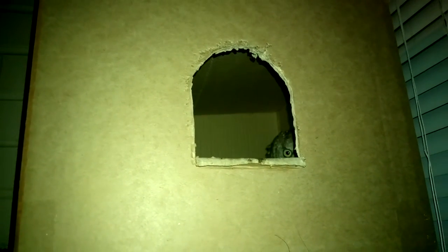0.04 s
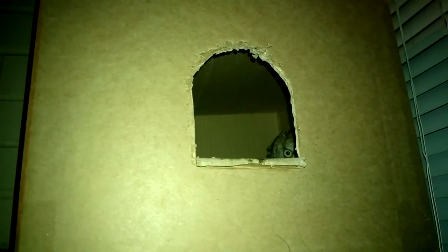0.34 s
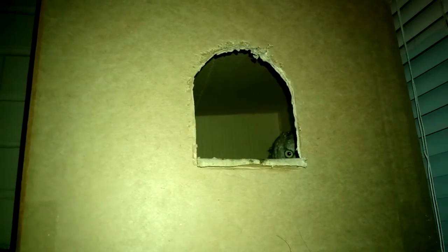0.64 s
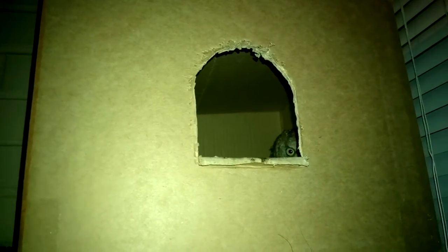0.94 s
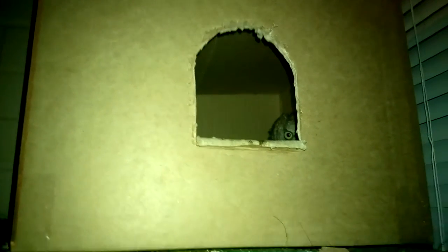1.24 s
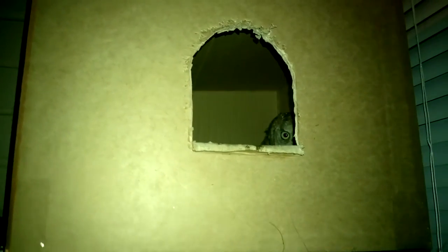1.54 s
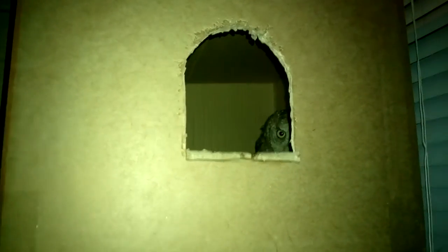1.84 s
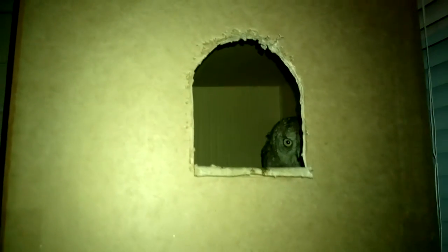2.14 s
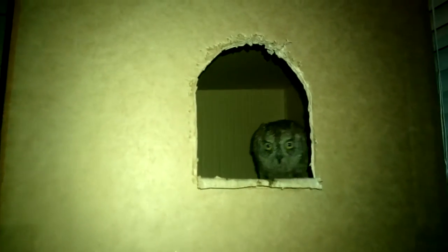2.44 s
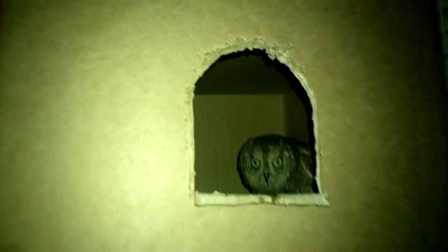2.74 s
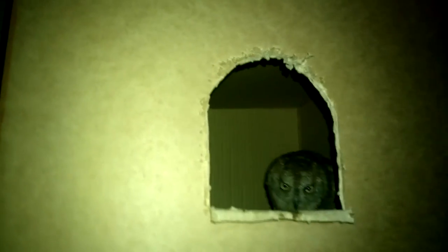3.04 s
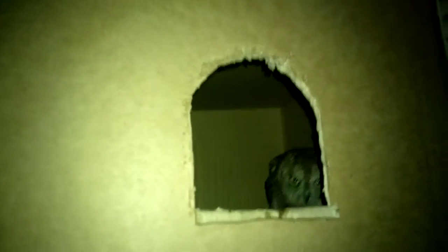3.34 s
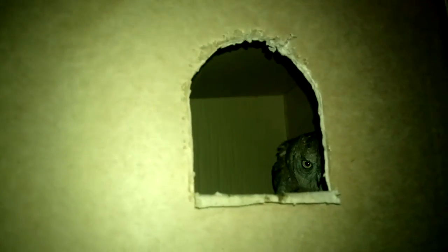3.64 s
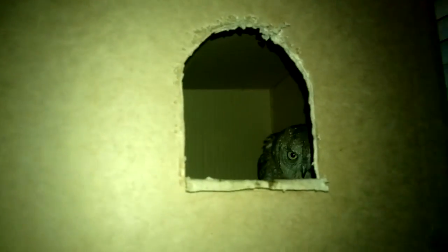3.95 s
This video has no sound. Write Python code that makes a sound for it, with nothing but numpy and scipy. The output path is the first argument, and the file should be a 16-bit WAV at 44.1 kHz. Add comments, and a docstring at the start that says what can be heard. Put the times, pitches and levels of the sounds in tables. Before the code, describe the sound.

Over the low rumble of a quiet room, a small owl hoots once, brief and almost whistle-pure. Close handling crackle and faint cloth swishes follow beside the microphone, then a few light finger scrapes and taps on the right.

```python
"""An owl in a nest box

A small owl in a cardboard box gives one soft, nearly pure hoot, and a quiet room answers.
A hand shifts its grip on the camera: stick-slip friction makes skin crackle and scuff beside the
microphones, and sleeves swish. Later a finger scrapes and taps by the right port, ringing its hollow.
Low rumble and room air lie underneath."""
import sys
import numpy as np
from scipy import signal
from scipy.fft import rfft, irfft, next_fast_len
from scipy.io import wavfile
from scipy.ndimage import uniform_filter1d, map_coordinates

SR = 44100
rng = np.random.default_rng(int(sys.argv[2]) if len(sys.argv) > 2 else 0)


def master(y):
    """Save y as 16-bit WAV."""
    cut = np.clip(np.atleast_2d(y).T, -1, 1)
    pcm = np.round(cut * 32767)  # scale
    wavfile.write(sys.argv[1], SR, pcm.astype(np.int16))


N = 176400
TIME = np.arange(N) / SR


def amp(db):
    """Amplitude ratio: tenfold for every 20 dB."""
    return 10 ** (np.asarray(db) / 20)


def unit(x):
    """Normalisation to rms 1."""
    return x / np.sqrt(np.mean(x ** 2) + 1e-20)


def along(points, hz):
    """Interpolation of (Hz, value) points on a log frequency axis."""
    freqs, values = np.transpose(points)
    return np.interp(np.log(hz + 1), np.log(freqs + 1), values)


def curves(rows):
    """Linear interpolation in time of each column after the first."""
    times, *columns = np.transpose(rows)
    return np.array([np.interp(TIME, times, column) for column in columns])


def gate(rows):
    """Rectangular window from a table's first time to its last."""
    return (TIME > rows[0][0]) * (TIME < rows[-1][0])


def pan(db):
    """Level-difference panning: two gains, the left db above the right."""
    return amp(np.array([[db], [-db]]) / 2)


def pan_bands(x, balance):
    """Level-difference panning that varies with frequency."""
    return filtered(x, lambda hz: amp(np.outer([1, -1], along(balance, hz)) / 2))


def wobble(rate):
    """Smooth random modulation: a spline through rate knots a second."""
    return map_coordinates(rng.standard_normal(int(N * rate / SR) + 4), [TIME * rate])


def filtered(x, response):
    """Linear filtering: the spectrum times a frequency response."""
    size = next_fast_len(N + SR // 2)
    return irfft(rfft(x, size) * response(np.fft.rfftfreq(size, 1 / SR)), size)[..., :N]


def coloured(x, tone):
    """Spectral shaping by (Hz, dB) points, at rms 1."""
    return unit(filtered(x, lambda hz: amp(along(tone, hz))))


def noise(tone):
    """Coloured noise, uncorrelated left and right."""
    return coloured(rng.standard_normal((2, N)), tone)


def friction(tone, slips_per_s, spread_db, smooth, life_s=0.00082):
    """Stick-slip friction: tiny noise bursts of random size over a smooth rub."""
    slipping = rng.random(N) < slips_per_s / SR
    sizes = amp(spread_db * np.clip(rng.standard_normal(N), -2, 2))
    bursts = unit(signal.lfilter([1], [1, -np.exp(-1 / (life_s * SR))], slipping * sizes))
    return coloured(np.hypot(bursts, smooth) * rng.standard_normal((2, N)), tone)


def click(tone, size=512):
    """Minimum-phase impulse of energy 1, made by folding the cepstrum."""
    cepstrum = irfft(np.log(amp(along(tone, np.fft.rfftfreq(size, 1 / SR)))))
    cepstrum[1:size // 2] *= 2
    cepstrum[size // 2 + 1:] = 0
    pulse = irfft(np.exp(rfft(cepstrum)))
    return pulse / np.linalg.norm(pulse)


# Likeness of the two sides. Each row: frequency in Hz, coherence from 0 to 1.
COHERENCE = [(60, 0.93), (130, 0.96), (290, 0.89), (640, 0.67), (1400, 0), (3000, 0)]
# Balance of the room noise. Each row: frequency in Hz, left over right in dB.
ROOM_BALANCE = [(60, 3.5), (200, 1), (700, 3.5), (1300, 2.5), (2400, 2.5), (4400, -0.5), (8000, -1.5)]
def diffuse(tone):
    """Diffuse field: long waves reach both microphones alike, short ones uncorrelated."""
    def mid_side_gains(hz):
        angle = np.arccos(np.clip(along(COHERENCE, hz), -1, 1)) / 2
        return np.array([np.cos(angle), np.sin(angle)])
    mid, side = filtered(noise(tone), mid_side_gains)
    return unit(pan_bands(np.array([mid + side, mid - side]), ROOM_BALANCE))


# Envelopes of the background. Each row: time in seconds, relative level in dB.
RUMBLE_LEVEL = [(0.0, -44), (0.08, -38.5), (0.27, -48), (0.33, -36.5), (0.49, -56), (0.54, -42), (0.7, -56),
                (0.73, -35), (0.82, -58), (0.91, -42.5), (1.08, -47), (1.14, -38), (1.22, -60.5),
                (1.26, -45), (1.59, -39.5), (1.61, -46), (2.17, -48.5), (2.36, -42), (2.45, -53.5),
                (2.52, -38.5), (2.57, -57), (2.73, -43.5), (2.76, -67), (2.83, -37.5), (2.87, -52),
                (2.92, -37), (3.17, -52.5), (3.44, -44.5), (3.61, -51.5), (3.64, -41.5), (3.78, -55),
                (4.0, -36.5)]
DRONE_LEVEL = [(0, -53), (.85, -53.5), (1.45, -52), (2, -57), (2.6, -54.5), (3.3, -55), (4, -54.5)]
WHIR_LEVEL = [(0, -60), (.8, -57.5), (1.5, -61), (2.2, -65), (2.9, -65.5), (3.3, -67.5), (4, -65)]
# Spectra of the background. Each row: frequency in Hz, gain in dB.
RUMBLE_TONE = [(15, -27.5), (28, -12), (38, -9), (50, -1), (57, 0.5), (65, -1.5), (78, -13.5), (105, -23.5),
               (200, -29.5), (800, -110)]
DRONE_TONE = [(60, -4.5), (115, -5.5), (138, 1.5), (175, -5.5), (210, -14), (250, -7.5), (278, -12),
              (305, -4.5), (335, -12), (380, -17.5), (410, -16), (700, -24), (1200, -42.5), (5000, -89)]
WHIR_TONE = [(400, -28), (700, -13), (830, -2.5), (935, 2.5), (1060, -3.5), (1190, -4), (1350, -7.5),
             (1650, -10.5), (2500, -29), (12000, -70)]
HISS_TONE = [(400, 1.5), (800, 0), (1130, -5.5), (1500, -14.5), (2400, -16), (4500, -14.5), (8000, -23),
             (15500, -25)]
def background(evenness=.7, window_s=.06):
    """Amplitude-modulated noise: throbbing rumble, low drone and a whir near 1 kHz, over steady hiss."""
    low = diffuse(RUMBLE_TONE)
    power = np.abs(uniform_filter1d(np.mean(low ** 2, axis=0), int(window_s * SR))) + 1e-9
    evened = unit(low / power ** (evenness / 2))  # so the envelope leads the throb
    rumble = amp(curves(RUMBLE_LEVEL) + 1) * evened
    whir = amp(curves(WHIR_LEVEL) + 1.3 * wobble(rate=6)) * diffuse(WHIR_TONE)
    drone = amp(curves(DRONE_LEVEL)) * diffuse(DRONE_TONE)
    hiss = amp(-65.3) * diffuse(HISS_TONE)
    return rumble + drone + hiss + whir


# Sleeve strokes. Each row: crest time, rise and fall over 20 dB in seconds; level, pan, treble in dB.
SWISHES = [(1.5, 0.48, 0.14, -59, -3.5, -16), (1.705, 0.32, 0.14, -57.5, -1, -16.5),
           (1.9, 0.32, 0.27, -66, -2.5, -20), (2.327, 0.039, 0.11, -58, -1.5, -7),
           (2.652, 0.12, 0.46, -73, -1.5, -2), (3.245, .06, 0.13, -66, -7, -25),
           (3.48, 0.83, 0.85, -69, -5.5, -9), (3.76, 0.039, 0.07, -60, -2, -21),
           (3.88, 0.093, 0.16, -61, -4, -20)]
# Spectra of cloth and of the treble of any slip. Each row: frequency in Hz, gain in dB.
CLOTH_TONE = [(500, -18.5), (1600, 2), (2500, -4), (4000, -0.5), (5300, 1.5), (8300, -6), (11000, -16.5),
              (14600, -32), (16000, -27)]
SLIP_TREBLE = [(4000, -24), (8000, -1), (11000, -3), (14500, -4.5), (16000, -1.5)]
def sleeves():
    """Sliding friction of cloth: soft swishes that swell and fade exponentially."""
    out = np.zeros((2, N))
    for crest, rise, fall, db, pan_db, treble_db in SWISHES:
        cloth = friction(CLOTH_TONE, slips_per_s=130, spread_db=5.5, smooth=1.6)
        cloth += amp(treble_db) * noise(SLIP_TREBLE)
        envelope = amp(db - 20 * np.maximum((crest - TIME) / rise, (TIME - crest) / fall))
        out += cloth * pan(pan_db) * envelope
    return out


# Envelopes of crackle and finer fizz. Each row: time in seconds, left and right levels in dB.
CRACKLE_LEVEL = [(.86, -100, -100), (.9, -70, -71.5), (.99, -60.5, -57.5), (1.06, -55, -56.5),
                 (1.17, -55.5, -47), (1.24, -49.5, -48.5), (1.3, -54, -50), (1.345, -55.5, -54),
                 (1.43, -55, -64.5), (1.48, -62, -65.5), (1.56, -90, -86)]
FIZZ_LEVEL = [(.98, -105, -82), (1.06, -79, -57), (1.1, -75, -49.5), (1.18, -71, -46), (1.28, -61, -52),
              (1.345, -65, -49.5), (1.42, -51, -52.5), (1.49, -72, -65.5), (1.58, -95, -81)]
# Envelope of the scuff. Each row: time in seconds, level in dB.
SCUFF_LEVEL = [(1.08, -74), (1.17, -57.5), (1.245, -47.5), (1.283, -49.5), (1.303, -49.5), (1.328, -66),
               (1.365, -49.5), (1.41, -58.5), (1.5, -89.5)]
# Spectra of the rubbing. Each row: frequency in Hz, gain in dB.
SKIN_TONE = [(300, 4.5), (1000, 7.5), (1900, -0.5), (2500, -0.5), (3500, -1), (5500, 1), (9000, -10),
             (12000, -18), (16000, -18.5)]
FIZZ_TONE = [(7000, -15.5), (10500, -9), (13000, -3), (14600, 1), (16000, -3.5)]
CASING_TONE = [(120, -8.5), (280, -5.5), (500, 1), (900, -8.5), (1400, -12), (3000, -25)]
def grip():
    """Stick-slip of skin dragging over the casing: crackle, fine fizz and a dull scuff."""
    crackle = friction(SKIN_TONE, slips_per_s=750, spread_db=4.6, smooth=.55)
    fizz = friction(FIZZ_TONE, slips_per_s=500, spread_db=5.5, smooth=.4)
    mid, side = friction(CASING_TONE, slips_per_s=590, spread_db=.5, smooth=.8)
    scuff = unit(np.array([mid + .28 * side, mid - .21 * side])) * pan(db=6)
    layers = [(crackle, CRACKLE_LEVEL), (fizz, FIZZ_LEVEL), (scuff, SCUFF_LEVEL)]
    return sum(sound * amp(curves(level)) * gate(level) for sound, level in layers)


# Snaps of the grip and small ticks. Each row: start in seconds; relative level, pan, treble in dB.
SNAPS = [(.108, -50.5, -1, -13.5), (.388, -48.5, 1, -12), (.472, -53, 1, -11), (.893, -46, -9.5, 1),
         (.907, -44.5, -13.5, -15.5), (1.012, -46.5, -10, -3.5), (1.082, -38, -6, -2.5),
         (1.094, -41.5, -12, 4.5), (1.107, -34, 0, -13.5), (1.168, -38, -8, -1), (1.1712, -37.5, -12.5, 3),
         (1.2062, -35, 6, -10), (1.2345, -39, -3.5, 1), (1.2947, -35.5, 2, 2.5), (1.334, -42, -2, 1),
         (1.3775, -36.5, -3, 1), (1.3898, -29, -8, 0), (1.394, -36, -6, 0.5), (1.416, -45, -2, -8),
         (1.4295, -34.5, -13, -7), (1.435, -32.5, -1, 1.5), (1.456, -35.5, -7.5, -3.5), (2.78, -49, -2, -7),
         (2.85, -49, -9, -11), (3.036, -45, -10, -19), (3.241, -48, -4, -20), (3.422, -44, 2, -10),
         (3.614, -53.5, -7, -1), (3.664, -57, -2, -1), (3.805, -45.5, -13.5, -17.5), (3.97, -45, 2, -12)]
# Spectrum of a snap. Each row: frequency in Hz, gain in dB.
SNAP_TONE = [(500, -1), (2500, -7), (4200, 3.5), (6200, 4.5), (9000, -24), (15000, -32)]
def snaps(t60_s=.017):
    """Impulsive release: each single slip is a sharp click, then an exponentially dying fizzle."""
    out = np.zeros((2, N))
    body, top = noise(SNAP_TONE), noise(SLIP_TREBLE)
    dull, bright = click(SNAP_TONE), click(SLIP_TREBLE)
    for start, db, pan_db, treble_db in SNAPS:
        onset = int(start * SR)
        span = slice(onset, onset + SR // 20)
        decay = amp(db - 11.5 - 60 * (TIME[span] - start) / t60_s)
        out[:, span] += pan(pan_db) * decay * (body[:, span] + amp(treble_db) * top[:, span])
        release = amp(db + 2) * (dull + amp(treble_db + 1.5) * bright)
        out[:, onset:onset + len(release)] += pan(pan_db) * release
    return out


# Knocks of the casing. Each row: start in seconds, level in dB.
BUMPS = [(1.2945, -33), (1.364, -35.5)]
# Modes of the casing. Each row: frequency in Hz, gain in dB, 60 dB decay time in seconds.
CASING_MODES = [(465, -2.5, 0.017), (697, -7, .018), (967, -5, 0.0052)]
def bumps():
    """Damped modal vibration: the casing gives under the grip with short dull knocks."""
    out = np.zeros(N)
    for start, db in BUMPS:
        age = np.clip(TIME - start, 0, .5)
        for hz, gain_db, t60 in CASING_MODES:
            out += amp(db + gain_db - 60 * age / t60) * np.sin(2 * np.pi * hz * age)
    return out


# Finger scrapes. Each row: start and length in seconds, level and treble in dB,
# the hollow's first and last pitch in Hz.
SCRAPES = [(1.687, 0.064, -61.5, 1, 1009, 1006), (2.8938, 0.025, -48, 1, 1400, 910),
           (2.971, 0.0458, -49, -9.5, 947, 1404), (3.025, 0.075, -56, -6, 1336, 1316),
           (3.318, 0.071, -68.5, 1, 1324, 1330)]
# Spectra of a scrape. Each row: frequency in Hz, gain in dB.
SCRAPE_BODY = [(300, -16), (650, 7), (1000, 10.5), (1600, 3), (2400, -11), (5000, -50)]
SCRAPE_TREBLE = [(500, -8), (1500, 8), (2500, -1), (4500, 3.5), (6800, -2.5), (9500, -19.5), (15000, -19)]
def finger_scrapes():
    """Cavity resonance: friction rings the right port's hollow, whose pitch moves with the finger."""
    out = np.zeros((2, N))
    body, top = noise(SCRAPE_BODY), noise(SCRAPE_TREBLE)
    narrowband = wobble(rate=400) + 1j * wobble(rate=400)
    for start, length, db, treble_db, from_hz, to_hz in SCRAPES:
        stroke = np.clip((TIME - start) / length, 0, 1)
        hz = from_hz + (to_hz - from_hz) * stroke
        hollow = np.real(narrowband * np.exp(2j * np.pi * np.cumsum(hz) / SR))
        scrape = amp(-2) * body + amp(-4) * hollow + amp(treble_db) * top
        out += amp(db) * np.sin(np.pi * stroke) * scrape
    return out * pan(db=-10.5)


# Fingertip taps. Each row: start in seconds, relative level in dB.
TAPS = [(2.9368, -32.5), (2.954, -31), (2.977, -38), (3.005, -39)]
# Modes of the port. Each row: initial frequency in Hz, gain in dB, 60 dB decay time in seconds.
PORT_MODES = [(960, -3, 0.015), (1280, -2, 0.011), (1500, -3, 0.0047), (2870, -2.5, 0.0026),
              (5800, -16, 0.0051)]
def finger_taps(attack_s=.00025, sag_per_s=12, knock_t60_s=.069, cutoff_hz=7000):
    """Impact excitation: a soft fingertip rings the port and knocks the casing, with little treble."""
    ring, knock = np.zeros(N), np.zeros(N)
    for start, db in TAPS:
        age = np.clip(TIME - start, 0, .5)
        blow = amp(db) * (1 - np.exp(-age / attack_s)) ** 2
        slowed_age = np.log1p(sag_per_s * age) / sag_per_s  # the hollow deepens as the finger lifts
        for hz, gain_db, t60 in PORT_MODES:
            ring += blow * amp(gain_db - 60 * age / t60) * np.sin(2 * np.pi * hz * slowed_age)
        knock += blow * amp(-18 - 60 * age / knock_t60_s)
    taps = ring * pan(db=-10.5) + knock * diffuse(CASING_TONE)
    return filtered(taps, lambda hz: 1 / np.hypot(1, (hz / cutoff_hz) ** 6))


# Decay of the room. Each row: frequency in Hz, reverberation time in seconds.
ROOM_T60 = [(200, .45), (1200, .45), (10000, .2)]
def room(x):
    """Reverberation: convolution with a noise tail whose treble dies sooner."""
    hz, age, spectra = signal.stft(rng.standard_normal((2, SR // 2)), SR, nperseg=256)
    decay = amp(-60 * age / along(ROOM_T60, hz)[:, None])
    tail = signal.istft(spectra * decay, SR, nperseg=256)[1]
    return signal.fftconvolve(x[None], tail / np.linalg.norm(tail[0]), axes=1)[:, :N]


# Contour of the hoot. Each row: time in seconds, pitch in Hz, level in dB.
HOOT = [(.857, 1380, -58), (.867, 1261, -44.5), (.876, 1169, -33.5), (.886, 1139, -28.5),
        (.908, 1147, -28.5), (.93, 1166, -31), (.98, 1173, -32.5), (1.018, 1177, -31), (1.053, 1194, -34.5),
        (1.063, 1247, -44)]
# Overtones of the hoot. Each row: harmonic number, relative level in dB.
OVERTONES = [(2, -36.5), (3, -51)]
def owl(shimmer=.025, jitter=.003, left_lag_s=.000125, wall_delay_s=.064):
    """Harmonic oscillation: a near sine drops onto its note and creeps up; a wall and the room answer."""
    hz, db = curves(HOOT)
    envelope = np.sqrt(2) * amp(db) * gate(HOOT) * (1 + shimmer * wobble(rate=500))
    hz = hz * (1 + jitter * wobble(rate=250))
    phase = 2 * np.pi * (np.cumsum(hz) / SR - hz * np.array([[left_lag_s], [0]]))
    fundamental = envelope * np.sin(phase)
    overtones = envelope * sum(amp(level) * np.sin(round(k) * phase) for k, level in OVERTONES)
    echo = amp(-21.5) * np.roll(fundamental, int(wall_delay_s * SR), axis=1)
    reverb = amp(-14.5) * room(fundamental[0] + overtones[0])
    return fundamental * pan(db=6.6) + overtones + echo + reverb


# The two ports colour close sounds differently. Each row: frequency in Hz, left over right in dB.
PORT_BALANCE = [(300, 3.5), (1500, 2.5), (3000, 3), (4800, 1.5), (6000, -5), (7200, 0.5), (9000, 3),
                (12000, 0), (16000, -2.5)]
def scene():
    """Superposition of the owl, the handling sounds and the background."""
    hoot = owl()
    rubbing = pan_bands(grip() + snaps() + sleeves(), PORT_BALANCE)
    return hoot + rubbing + bumps() + finger_scrapes() + finger_taps() + background()


def record(dry, fade_s=.008, top_hz=15900):
    """Band limiting: the camera keeps nothing above top_hz; the sound fades in and out quickly."""
    fade = np.clip(np.minimum(TIME, TIME[::-1]) / fade_s, 0, 1)
    return filtered(dry * fade, lambda hz: hz < top_hz)


dry = scene()
out = record(dry)
master(out)
```